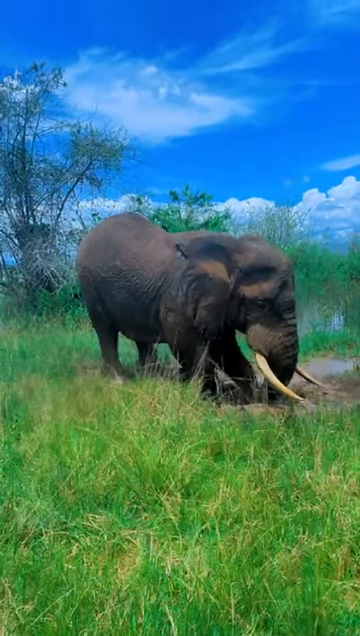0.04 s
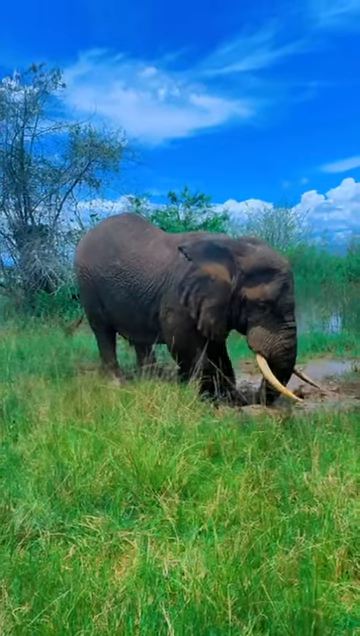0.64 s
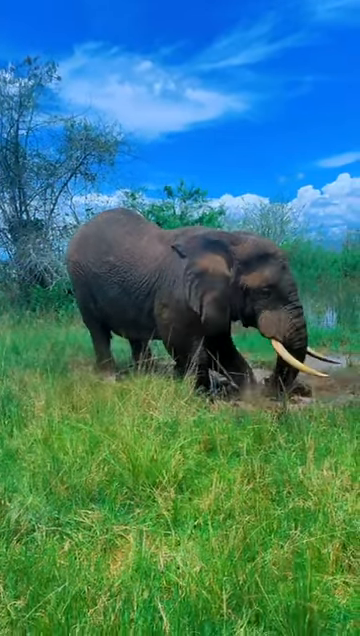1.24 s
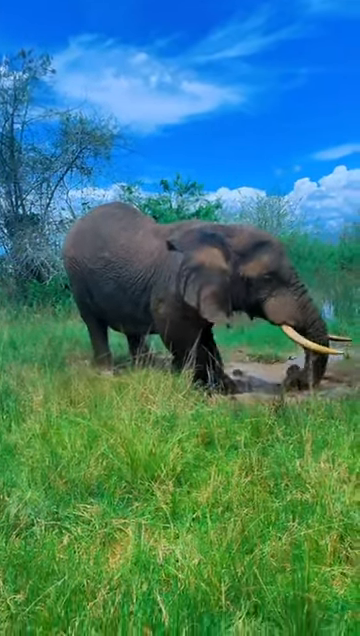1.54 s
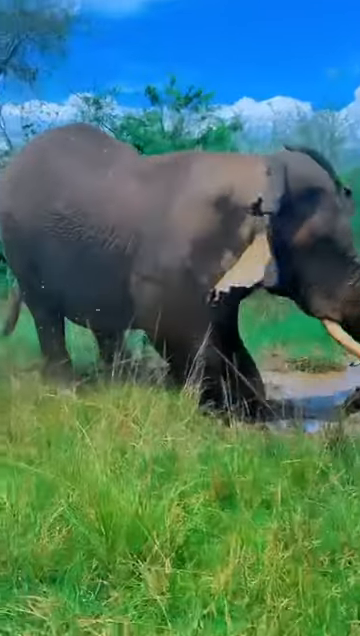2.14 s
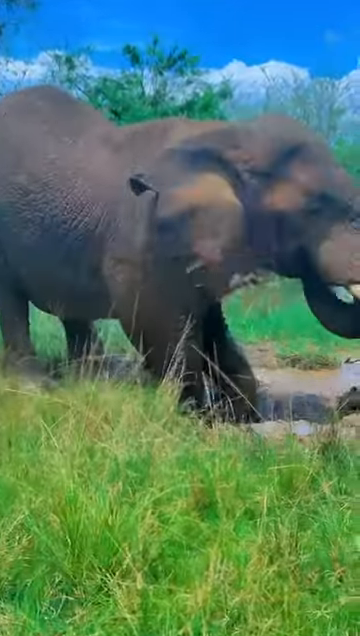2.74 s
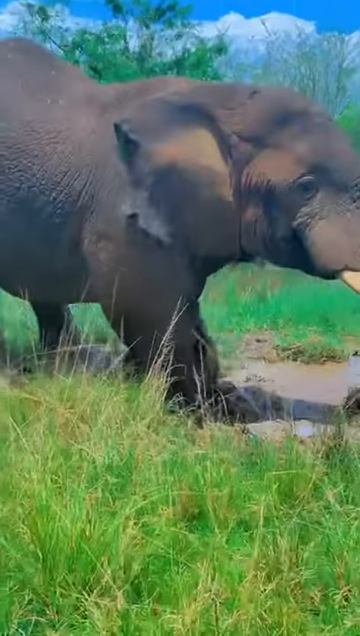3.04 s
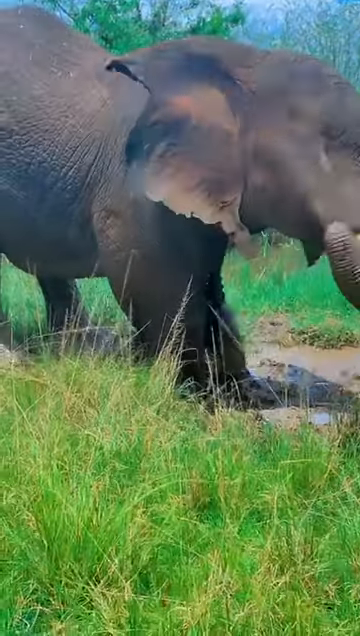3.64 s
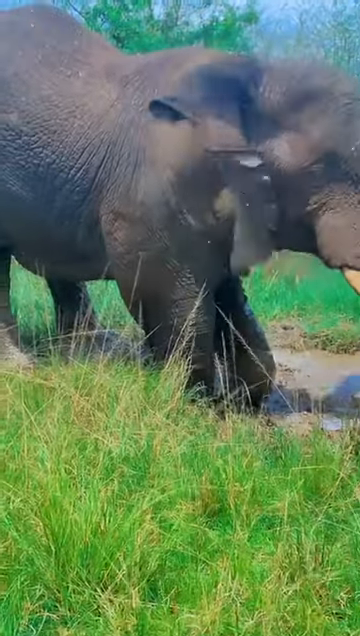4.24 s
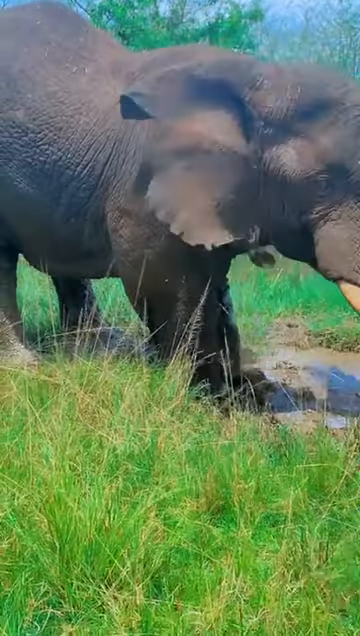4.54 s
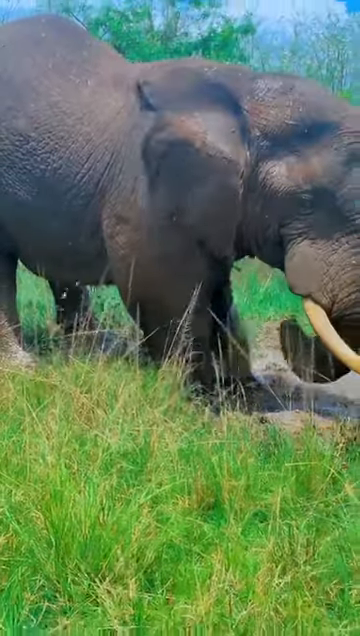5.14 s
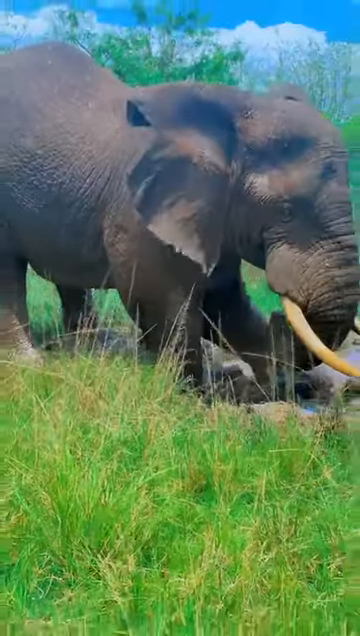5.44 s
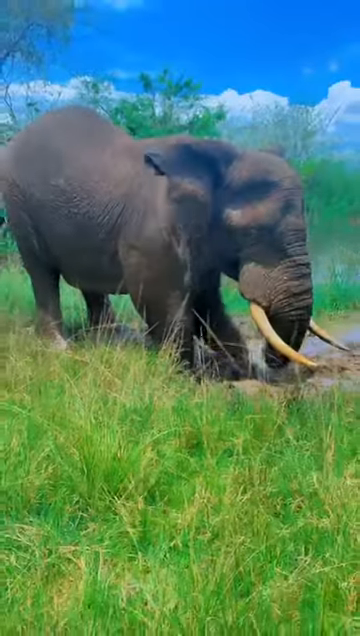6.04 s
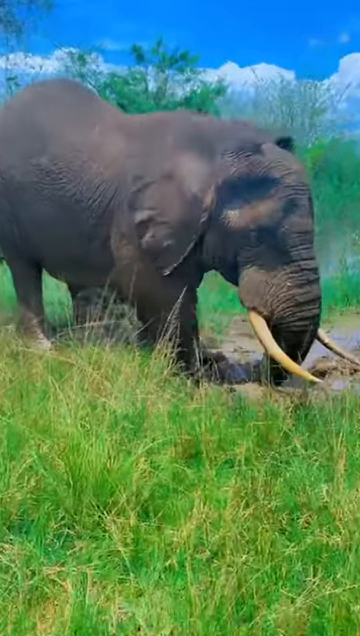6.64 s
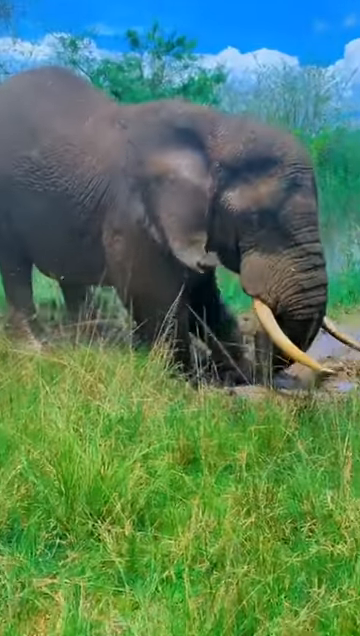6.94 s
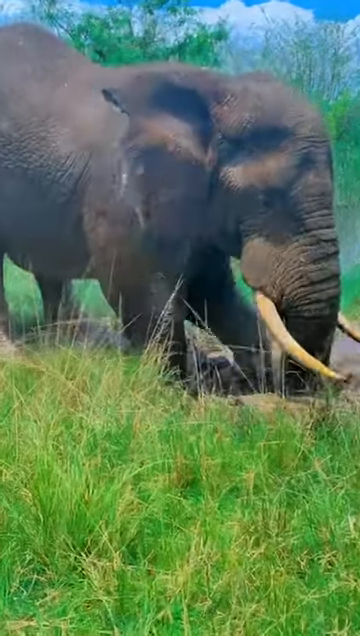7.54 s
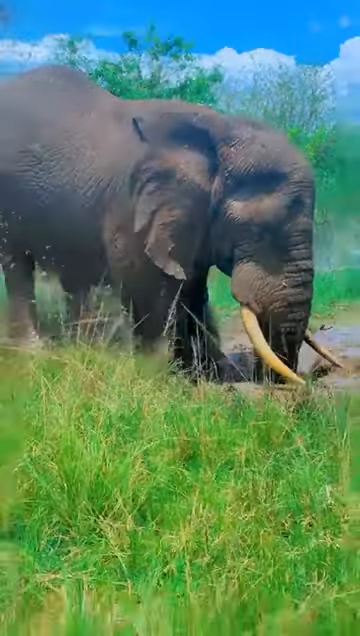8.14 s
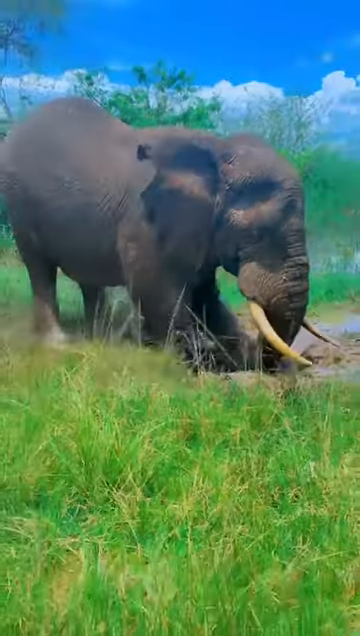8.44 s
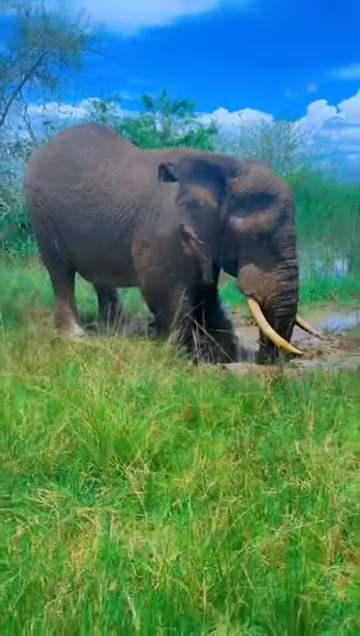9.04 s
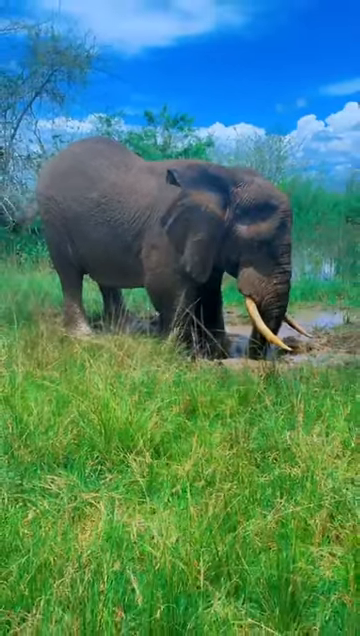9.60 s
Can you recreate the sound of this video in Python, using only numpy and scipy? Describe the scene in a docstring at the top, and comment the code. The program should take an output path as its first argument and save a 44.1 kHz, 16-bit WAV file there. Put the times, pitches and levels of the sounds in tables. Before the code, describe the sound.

Mud and water splash, gurgle and patter as an elephant wallows outdoors, with one long, sputtering trunk blow midway.

```python
"""Elephant in a mud bath

An elephant churns a muddy waterhole with its feet and trunk, some way off across grass.
Thrown mud patters down as a bright spray of tiny clicks, and heavy clods slap and thud.
The water sloshes and gulps because trapped bubbles ring: the bigger the bubble, the lower the note.
Midway the trunk blows a long jet of air and muddy water, which hisses as the tip narrows."""
import sys
import numpy as np
from scipy import signal
from scipy.fft import rfft, irfft, next_fast_len
from scipy.io import wavfile
from scipy.ndimage import uniform_filter1d, map_coordinates

SR = 44100
rng = np.random.default_rng(int(sys.argv[2]) if len(sys.argv) > 2 else 0)


def waveform_to_disk(signal):
    """Save audio, clipped to [-1, 1], as 16-bit WAV at the path in sys.argv[1]."""
    frames = np.transpose(np.atleast_2d(signal))
    scaled = np.clip(frames, -1, 1) * 32767
    samples = np.round(scaled).astype(np.int16)
    wavfile.write(sys.argv[1], SR, samples)


N = 435266

# tone colour of falling drops: f/Hz, level/dB
DROP_SPECTRUM = [(1500, -26), (3200, -16), (4300, -10.5), (5000, -11.5), (5500, -5.5), (6100, -6.5),
                 (6800, -7.5), (8000, -2), (9200, -2.5), (9800, -4.5), (10500, -5.5), (11400, -8.5),
                 (12000, -22)]
# tone colour of sloshing water: f/Hz, level/dB
SLOSH_SPECTRUM = [(300, -45), (560, -3.5), (690, -3), (810, -0.5), (885, -14), (1030, -0.5), (1260, -1),
                  (1460, -4.5), (1850, -3), (2130, 1.5), (2550, -8.5), (3300, -8.5), (4300, -4),
                  (8000, -28)]
# sweeps of a leg or the trunk through the pool: crest/s, rise/s, fall/s, spray/dB, slosh/dB
STROKES = [(.03, 0.65, 0.3, -23.5, -36), (.88, 0.31, 1, -25, -43.5), (1.27, 0.22, 0.42, -25.5, -36.5),
           (1.7, 0.2, 0.18, -25, -37.5), (2.13, 0.22, 0.082, -34.5, -42), (2.48, 0.24, 0.3, -23.3, -36.5),
           (3.19, 0.087, 0.22, -24.5, -39.5), (3.44, 0.1, 0.23, -24, -34.5), (5.08, 0.15, 0.17, -43, -49.5),
           (5.5, 0.31, 0.089, -29, -49), (5.78, 0.21, 0.14, -25, -34), (6.55, 0.69, 0.57, -32.5, -41.5),
           (7.25, 0.29, 1, -25, -40.5), (7.57, 0.28, 0.14, -23, -30), (8.42, 0.54, 1, -30.5, -44.5),
           (8.83, 0.16, 0.22, -25.5, -35.5)]
BLOW = (3.876, 0.53, 0.34)  # the blow through the trunk: crest/s, rise/s, fall/s
ROUNDNESS = 1.48  # shape of a swell: 1 is a sharp peak, 2 a bell


def amp(db):
    """Turn decibels into a gain to multiply by."""
    return 10 ** (np.asarray(db) / 20)


def unit(x):
    """Scale x to an average (rms) level of 1."""
    return x / np.sqrt(np.mean(x ** 2) + 1e-20)


def along(points, hz):
    """Read between (f/Hz, value) points, with octaves evenly spaced."""
    freqs, values = np.transpose(points)
    return np.interp(np.log(hz + 1), np.log(freqs), values)


def wobble(rate):
    """A smooth curve through random values, rate of them a second."""
    values = rng.standard_normal(int(N * rate / SR) + 4)
    return map_coordinates(values, [np.arange(N) * rate / SR], order=2)


def filtered(x, response):
    """Scale each frequency in x by the gain response(hz)."""
    size = next_fast_len(N + SR // 4)
    return irfft(rfft(x, size) * response(np.fft.rfftfreq(size, 1 / SR)), size)[:N]


def bandpass(x, low_hz, high_hz):
    """Keep mainly what lies between two frequencies."""
    return signal.sosfilt(signal.butter(2, [low_hz, high_hz], "band", fs=SR, output="sos"), x)


def coloured(x, spectrum):
    """Give x a tone colour and an average level of 1."""
    return unit(filtered(x, lambda hz: amp(along(spectrum, hz))))


def add(track, start, sound):
    """Mix a sound into the track, start seconds in."""
    part = track[round(start * SR):][:len(sound)]
    part += sound[:len(part)]


def together(gains):
    """The combined gain of unrelated sounds: their powers add."""
    return np.sqrt(sum(gain ** 2 for gain in gains))


def swell(crest, rise, fall):
    """A gain of 1 at the crest, 10 dB lower rise seconds before and fall seconds after."""
    t = np.arange(N) / SR - crest
    return amp(-10 * np.abs(t / np.where(t < 0, rise, fall)) ** ROUNDNESS)


def swells(rows):
    """The combined gain of several swells."""
    return together(amp(db) * swell(crest, rise, fall) for crest, rise, fall, db in rows)


def tailed_swell(crest, rise, fall, tail_db, db_per_s):
    """A swell that leaves a dying tail."""
    t = np.arange(N) / SR - crest
    return np.maximum(swell(crest, rise, fall), (t > 0) * amp(tail_db - db_per_s * np.abs(t)))


def spurts(rate, life_s, spread_db):
    """A ragged gain: little bursts, rate a second, that start at once and die away."""
    starts = (rng.random(N) < rate / SR) * amp(spread_db * np.clip(rng.standard_normal(N), -2, 2))
    power = signal.lfilter([1], [1, -np.exp(-1 / (life_s * SR))], starts ** 2)
    return unit(np.sqrt(power))


def patchy(x, depth_db):
    """Each spot of mud colours its sound differently for a few hundredths of a second."""
    spectra = signal.stft(x, nperseg=1024)[2]
    patches = uniform_filter1d(rng.standard_normal(spectra.shape), size=3, axis=0)
    patches = unit(uniform_filter1d(patches, size=4, axis=1))
    return unit(signal.istft(spectra * amp(depth_db * patches), nperseg=1024)[1][:N])


def patter(rate, spread_db, wash_db):
    """Tiny impacts, rate a second, over the wash of countless smaller ones."""
    lands = rng.random(N) < rate / SR
    size = amp(spread_db * np.minimum(rng.exponential(size=N), 5))
    clicks = unit(lands * size * rng.choice([-1, 1], N))
    return unit(clicks + amp(wash_db) * rng.standard_normal(N))


def bubbles(count, low_hz, high_hz, cycles, spread_db):
    """Bubbles of random size ring for a few cycles and rise in pitch as they surface."""
    when, smallness, chance = rng.random((count, 3)).T[:, :, None]
    hz = low_hz * (high_hz / low_hz) ** smallness
    n = np.arange(int(4 * cycles / low_hz * SR))
    age = hz * n / SR / cycles
    phase = 2 * np.pi * cycles * age * (1 + 0.035 * np.minimum(age, 4))
    rings = np.sin(phase) * np.exp(-age) * hz * amp(-spread_db * np.log(chance + 0.08))
    positions = (when * N).astype(int) + n
    return unit(np.bincount(positions.ravel(), rings.ravel(), N)[:N])


def resonance(hz, width_hz):
    """Air noise caught in one band around a pitch, which may move."""
    phase = 2 * np.pi * np.cumsum(hz * np.ones(N)) / SR
    return unit(wobble(width_hz) * np.cos(phase) + wobble(width_hz) * np.sin(phase))


def open_air():
    """A faint stir of air, mostly low rumble."""
    spectrum = [(20, 24), (100, 11.5), (400, -10), (2000, -35), (10000, -26)]  # f/Hz, level/dB
    return amp(-55.5) * coloured(rng.standard_normal(N), spectrum)


def bank_echo(x):
    """Banks and bushes scatter the sound back as a short tail."""
    # how long the echo lasts: f/Hz, t60/s (t60 is the time to fade by 60 dB)
    fade_times = [(100, 0.26), (1000, 0.23), (10000, 0.23)]
    hz, t, spectra = signal.stft(rng.standard_normal(SR // 3), SR, nperseg=256)
    tail = signal.istft(spectra * amp(-60 * t / along(fade_times, hz)[:, None]), SR, nperseg=256)[1]
    return signal.fftconvolve(x, tail / np.linalg.norm(tail))[:N]


def squelches(width_hz=88):
    """Mud squeezes past a foot and drones in the hollow around it."""
    # squeezes of mud: crest/s, rise/s, fall/s, level/dB, f/Hz
    squeezes = [(2.92, 0.034, 0.046, -39, 162), (6.585, 0.049, 0.069, -32.5, 145),
                (6.81, 0.1, 0.068, -37.5, 150), (7.43, 0.15, 0.097, -36, 270),
                (8.19, 0.14, 0.063, -47, 180)]
    out = np.zeros(N)
    for crest, rise, fall, db, hz in squeezes:
        drone = unit(bandpass(rng.standard_normal(SR), hz - width_hz / 2, hz + width_hz / 2))
        add(out, crest - 0.5, amp(db) * swell(0.5, rise, fall)[:SR] * drone)
    return out


def smacks():
    """Wet mud tears open with a click, and the little hollow behind it rings."""
    # suction pockets opening: t/s, level/dB
    openings = [(1.256, -22), (8.574, -13), (8.8645, -10), (8.955, -19)]
    # the notes of such a pocket: f/Hz, relative level/dB, t60/s
    notes = [(2140, -7, 0.017), (4350, -5, .016), (5450, -2.5, .016)]
    out, t = np.zeros(N), np.arange(SR // 10) / SR
    for start, db in openings:
        for hz, note_db, t60 in notes:
            peak_db = db + note_db + rng.standard_normal()
            add(out, start, amp(peak_db - 60 * t / t60) * np.sin(2 * np.pi * hz * t))
    return out


def ticks(crack_t60=0.0018):
    """Single fat drops crack on the wet surface and throw off a wisp of droplets."""
    # sharp drops and snaps of sticky mud: t/s, relative level/dB, wisp t60/s, f/Hz
    snaps = [(0.4088, -3, 0.0026, 7700), (0.4092, 4, 0.0055, 8800), (.4116, -1.5, 0.038, 9000),
             (1.5983, -16, 0.03, 8300), (2.284, -8.5, 0.085, 8950), (5.018, -11.5, 0.02, 6700),
             (5.1105, -12, 0.017, 8400), (5.553, -12.5, 0.061, 3620), (6.8994, -1.5, 0.004, 10100),
             (6.929, -10, 0.025, 8500), (7.128, -9, .02, 8300), (7.2175, -5, 0.025, 7750),
             (8.4255, -25, .02, 8200), (8.61, -9, .01, 9300), (8.8645, -7, 0.012, 8500),
             (9.729, -17.5, 0.025, 8000)]
    out, t = np.zeros(N), np.arange(SR // 10) / SR
    for start, db, t60, hz in snaps:
        crack = np.sin(2 * np.pi * hz * t) * amp(2 - 60 * t / crack_t60)
        crack[0] += 1.5  # the dry click of first contact
        wisp = rng.standard_normal(len(t)) * amp(-7 - 60 * t / t60)
        add(out, start, amp(db - 4.5) * bandpass(crack + wisp, 0.5 * hz, 11500))
    return out


def plops(glide=0.29, roughness=0.35):
    """A lone bubble rings and glides up in pitch; thick water roughens its note."""
    # bubbles left by lumps that drop into open water: t/s, level/dB, starting f/Hz, t60/s
    lone_bubbles = [(.6442, -15, 687, 0.022), (.654, -17, 840, 0.015), (2.104, -30, 382, 0.064),
                    (2.486, -30, 357, 0.056), (2.597, -27, 387, 0.19), (3.082, -30.5, 612, 0.084),
                    (5.356, -34, 920, 0.069), (5.512, -31.5, 347, 0.11), (5.619, -28.5, 380, 0.067),
                    (5.649, -31, 375, .065), (6.517, -14, 750, 0.035), (6.793, -27, 620, 0.017),
                    (8.666, -28.5, 390, 0.06), (8.941, -20, 1980, 0.046), (9.157, -33, 388, 0.041),
                    (9.442, -39, 334.7, 0.064), (9.66, -33.5, 382, 0.055)]
    out, t = np.zeros(N), np.arange(SR // 5) / SR
    for start, db, hz, t60 in lone_bubbles:
        phase = 2 * np.pi * np.cumsum(hz * (1 + glide * np.minimum(t / t60, 1))) / SR
        slop = unit(bandpass(rng.standard_normal(len(t)), 0.5 * hz, 2 * hz))
        level = amp(db - 60 * t / t60) * (1 - np.exp(-2 * t * hz))
        add(out, start, level * (np.sin(phase) + roughness * slop))
    return out


def air_pocket(hz, t60):
    """Trapped air rings briefly, rising in pitch, while the mud around it shudders."""
    t = np.arange(SR // 3) / SR
    pitch = hz * (0.934 + 0.57 * np.minimum(t / t60, 1))
    ring = np.sin(2 * np.pi * np.cumsum(pitch) / SR)
    shudder = unit(bandpass(rng.standard_normal(len(t)), 0.46 * hz, 1.47 * hz))
    depth = 1 / (1 + (hz / 220) ** 2)  # big, deep pockets are mostly shudder
    level = amp(-60 * t / t60) * (1 - np.exp(-t * hz / 0.31))
    return level * ((1.3 - 0.86 * depth) * ring + (0.73 + 1.1 * depth) * shudder)


def gulps_and_thuds():
    """Air pockets close in the mud: singly as a gulp, or several at once under a thud; a few wet slaps sound
    alongside, short and broad."""
    # single pockets, and a few short, broad wet slaps near 1 kHz made the same way: t/s, level/dB, f/Hz
    gulps = [(0.287, -20.5, 168), (0.323, -13.5, 473), (.645, -28, 1090), (0.983, -28.5, 1730),
             (1.676, -27, 400), (2.031, -28, 330), (2.311, -26, 2120), (2.462, -32, 275),
             (2.819, -24.5, 101), (3.31, -27, 229), (3.36, -26, 760), (4.662, -24.5, 776),
             (4.685, -24.5, 1090), (5.322, -34, 836), (5.327, -32, 131), (6.29, -30, 244),
             (6.347, -35, 690), (6.52, -24, 1030), (7.914, -22.5, 1310), (8.104, -33, 163),
             (8.205, -27, 1214), (8.535, -32, 263), (9.131, -35, 100)]
    # heavy clods and footfalls: t/s, level/dB, hardness/(dB per octave)
    thuds = [(.305, -21, -2), (0.646, -30.5, 6.5), (4.661, -28, -1.5), (6.347, -26.5, 0.5),
             (6.518, -25, 0.5), (6.795, -27, 4), (7.732, -23.5, -1), (7.799, -13, 2), (8.2, -29.5, 6)]
    # the notes the mud answers a thud with: f/Hz, relative level/dB, t60/s
    mud_notes = [(154, 2.5, 0.11), (356, -0.5, 0.056), (715, -3, 0.016)]
    # how the path low over wet ground colours them all: f/Hz, gain/dB
    ground_path = [(60, -7), (100, -2.5), (160, -3.5), (300, -3), (390, 5.5), (450, 1.5), (520, -9.5),
                   (640, 2), (800, -3.5), (890, -12), (1030, -4), (1300, 1)]
    out, middle_hz = np.zeros(N), mud_notes[1][0]
    for start, db, hz in gulps:
        t60 = 0.063 * (400 / hz) ** 0.26  # small pockets die sooner
        add(out, start, amp(db) * air_pocket(hz, t60))
    for start, db, hardness in thuds:
        for hz, note_db, t60 in mud_notes:
            closing_s = 0.94 / hz  # deep pockets close slowly, so they sound last
            level = amp(db + note_db + hardness * np.log2(hz / middle_hz))
            add(out, start + closing_s, level * air_pocket(hz, t60))
    return filtered(out, lambda hz: amp(along(ground_path, hz)))


def splashes():
    """A clod lands with a wet slap and bursts into bright drops that fade away."""
    # clods landing: t/s, level/dB, landing time/s, t60/s, slap compared with drops/dB
    clods = [(0.049, -31.5, 0.011, 0.062, 3), (0.294, -16.5, 0.03, 0.37, -11.5),
             (0.474, -22, 0.005, 0.31, -9.5), (0.606, -30, 0.0029, 0.092, -7.5),
             (0.657, -38.5, 0.011, 0.04, 11), (.722, -26.5, 0.021, 0.058, -14),
             (.972, -23.5, 0.029, 0.12, -19), (1.053, -23.5, .008, 0.062, -7),
             (1.12, -18, 0.0045, 0.017, -26), (1.156, -24, .005, .05, -17),
             (1.202, -24.5, 0.051, 0.16, -5.5), (1.43, -27.5, 0.023, .06, -4),
             (1.506, -23.5, .006, 0.021, -13), (1.668, -26, 0.061, 0.21, -7),
             (1.869, -23, 0.0092, 0.043, -20), (2.008, -27, 0.0064, 0.036, -18),
             (2.08, -30, 0.0051, 0.046, -2.5), (2.135, -27.5, 0.0087, 0.067, -25),
             (2.308, -18.5, 0.006, 0.22, -16), (2.431, -17, 0.01, 0.14, -34), (2.46, -32, 0.012, 0.053, 2),
             (2.889, -35, 0.048, .14, -0.5), (3.102, -27.5, 0.004, 0.15, -5.5),
             (4.652, -20.5, 0.033, 0.21, -9), (4.804, -40.5, 0.0067, 0.051, 4),
             (4.815, -29.5, 0.017, 0.046, -35), (5.178, -32, 0.0037, .05, -20),
             (5.227, -29, 0.0058, 0.065, -12), (5.32, -43, 0.0057, 1, 3.5), (6.21, -29.5, 0.015, 0.053, -8),
             (6.346, -21.5, 0.014, 0.36, -14), (6.405, -30, 0.0075, 0.17, 2.5),
             (6.515, -26.5, 0.0097, 0.039, -10), (6.585, -29, .008, 0.11, -16),
             (6.629, -25.5, 0.01, 0.032, -5), (6.679, -27, 0.011, 0.028, -5),
             (6.781, -23.5, 0.021, 0.12, -5), (6.9792, -27.5, 0.0033, 0.029, -9.5),
             (7.013, -28.5, 0.0079, 0.083, -8), (7.116, -19.5, 0.016, 0.18, -10),
             (7.575, -20.5, 0.051, 0.15, -9.5), (7.722, -15.5, 0.03, 0.059, -14),
             (7.741, -18.5, 0.038, 0.52, -8), (7.786, -22.5, 0.019, 0.16, -2.5),
             (7.91, -15.5, 0.0067, 0.24, -16), (8.2, -24.5, 0.0064, 0.17, -5.5),
             (8.555, -25.5, 0.024, 0.078, -18), (8.712, -26, 0.048, 0.17, -8.5),
             (8.941, -23, 0.013, 0.07, -8), (9.21, -33, 0.018, 0.1, -7.5),
             (9.6615, -36, .002, 0.049, -43.5)]
    drop_level, slap_level, t = np.zeros(N), np.zeros(N), np.arange(SR // 2) / SR
    for start, db, landing, t60, slap_db in clods:
        rise = amp(db) * (1 - np.exp(-t / (0.0002 + 0.2 * landing)))
        fall_db = -60 * np.maximum(t - landing, 0) / t60
        add(drop_level, start, rise * amp(fall_db))
        add(slap_level, start, rise * amp(slap_db + 0.98 * fall_db))
    drops = patchy(patter(rate=6000, spread_db=-4, wash_db=4.5), depth_db=1)
    slap = patchy(patter(rate=2700, spread_db=3, wash_db=-1), depth_db=4)
    return drop_level * coloured(drops, DROP_SPECTRUM) + slap_level * coloured(slap, SLOSH_SPECTRUM)


def stirring():
    """Legs and trunk push through the pool: small bubbles slosh, large ones gurgle, the mud heaves."""
    # the animal shifts its weight in the mud: crest/s, rise/s, fall/s, relative level/dB
    heaves = [(.32, 0.075, 0.09, -26.5), (1.68, 0.14, 0.12, -35), (2.4, 0.84, .3, -50),
              (2.84, 0.028, 0.29, -34), (3.58, 0.32, 0.41, -31.5), (4.68, 0.024, 0.47, -43),
              (6.6, 0.36, 0.51, -40.5), (7.812, 0.066, 0.023, -20.5)]
    # tone colours of large bubbles and of churned mud: f/Hz, level/dB
    gurgle_spectrum = [(70, -34), (170, -4.5), (270, -1), (330, -2.5), (390, 5.5), (440, 1.5), (500, -27),
                       (800, -11)]
    mud_spectrum = [(20, -32), (42, -12), (62, -9.5), (90, -6), (150, -2.5), (260, -16), (500, -16),
                    (1500, -37)]
    motion = together(amp(db) * tailed_swell(crest, rise, fall, tail_db=-12, db_per_s=12)
                      for crest, rise, fall, _, db in STROKES)  # the tail is the pool settling
    fizz = amp(-15) * bubbles(count=2400, low_hz=575, high_hz=3840, cycles=3.4, spread_db=4)
    froth = fizz + patchy(patter(rate=2300, spread_db=1, wash_db=3.5), depth_db=2)
    pockets = amp(-15) * bubbles(count=1200, low_hz=171, high_hz=557, cycles=3.6, spread_db=5.5)
    pockets += unit(rng.standard_normal(N))
    laps = spurts(rate=800, life_s=0.009, spread_db=3.5)
    slosh = amp(2.5) * motion * laps * coloured(froth, SLOSH_SPECTRUM)
    large_share = (motion / motion.max()) ** 0.055  # harder strokes trap more large bubbles
    gurgle = motion * large_share * coloured(pockets, gurgle_spectrum)
    heave = together([swells(heaves), amp(-12.5) * motion])
    lumps = amp(1.5 * wobble(25))
    mud = amp(-3) * heave * lumps * coloured(rng.standard_normal(N), mud_spectrum)
    return slosh + gurgle + mud


def spray(fat_drops_per_s=22):
    """Drops of thin mud, thrown by each stroke and by the trunk's blow, fall back in little spurts."""
    runoff = dict(tail_db=-16, db_per_s=6)  # water keeps running off, ever less
    thrown = together(amp(db) * tailed_swell(crest, rise, fall, **runoff)
                      for crest, rise, fall, db, _ in STROKES)
    level = together([thrown, amp(-20) * tailed_swell(*BLOW, **runoff)])
    clumps = spurts(rate=1300, life_s=0.003, spread_db=3)
    drops = patchy(patter(rate=5900, spread_db=0, wash_db=7.5), depth_db=3)
    fat_drops = unit((rng.random(N) < fat_drops_per_s / SR) * rng.uniform(0.64, 1, N))
    fat_drops *= amp(-19) * (level.max() / level) ** 0.25  # they stand out as the spray thins
    return amp(0.5) * level * coloured(clumps * drops + fat_drops, DROP_SPECTRUM)


def trunk_jet(tube_hz=396, tip_hz=1777, tip_hz_per_s=1300):
    """Air and water flutter out of the trunk and make its tube sing; the narrowing tip hisses."""
    # tone colours of the jet's rush, hiss and flutter: f/Hz, level/dB
    rush_spectrum = [(300, -7), (520, -7), (680, 0.5), (800, -1.5), (890, -10), (1050, 3), (1250, 1),
                     (1600, -11), (3000, -56)]
    hiss_spectrum = [(900, -17), (1450, -9.5), (1660, 3), (1900, -5), (2130, 1.5), (2600, -5), (3200, -4),
                     (3800, -6.5), (4300, -1), (4900, -10), (6000, -9), (11000, -11)]
    flutter_spectrum = [(45, -9), (90, -3), (135, -8), (200, 5.5), (310, -2), (480, -16), (900, -19.5)]
    # the slack trunk flutters as the blow starts and gives out: crest/s, rise/s, fall/s, level/dB
    flutters = [(3.31, 0.23, 0.11, -33.5), (4.36, 0.17, 0.39, -35)]
    # water gushes through the tip near the end of the blow, and a hollow sigh of air follows as it gives out:
    # crest/s, rise/s, fall/s, level/dB, f/Hz, width/Hz
    surges = [(3.92, 0.094, 0.048, -38, 687, 201), (4.04, 0.036, 0.044, -29, 1310, 601),
              (4.115, 0.043, 0.23, -32, 2036, 481), (4.36, 0.25, 0.32, -41, 1290, 602),
              (4.53, .2, 0.17, -48.5, 722, 448)]
    narrowing = (3.976, 0.2, 0.28)  # of the tip: crest/s, rise/s, fall/s
    t, blow = np.arange(N) / SR, swell(*BLOW)

    def air(spectrum, depth_db):
        """Rushing air: noise whose tone colour flickers."""
        return coloured(patchy(rng.standard_normal(N), depth_db), spectrum)

    rush = amp(-33) * blow * air(rush_spectrum, depth_db=3)
    hiss_level = together([tailed_swell(*narrowing, tail_db=-2, db_per_s=58), amp(-4) * blow])
    hiss = amp(-21.5) * hiss_level * air(hiss_spectrum, depth_db=3)
    flutter = together([swells(flutters), amp(-41.5) * blow]) * air(flutter_spectrum, depth_db=4.5)
    tip_open = np.exp(-np.abs(t - np.clip(t, 3.41, 3.86)) / 0.0049)  # 1 while the tip is wide open
    gargle = unit(amp(3 * wobble(55)))  # water in the tube breaks up its note
    tube_note = amp(-35.5) * np.sqrt(blow) * tip_open * gargle * resonance(tube_hz, width_hz=36)
    tip_pitch = tip_hz + tip_hz_per_s * np.clip(t - narrowing[0], -0.5, 0.15)
    tip_note = amp(-34) * swell(*narrowing) * resonance(tip_pitch, width_hz=620)
    surge_notes = sum(amp(db) * swell(crest, rise, fall) * resonance(hz, width)
                 for crest, rise, fall, db, hz, width in surges)
    sputter = amp(0.8 * wobble(64))
    return sputter * (rush + hiss + flutter) + tube_note + tip_note + surge_notes


def scene():
    """The mud bath in the open, in mono; only the sudden sounds get an echo."""
    hits = splashes() + gulps_and_thuds() + plops() + ticks() + smacks()
    flowing = open_air() + spray() + stirring() + squelches() + trunk_jet()
    return (flowing + hits + amp(-7.5) * bank_echo(hits))[None]


def record(dry, bass_hz=42, ceiling=0.8, top_hz=12000):
    """The microphone sheds the deepest bass and cuts the highest treble; the loudest peaks are rounded off
    softly."""
    trimmed = filtered(dry[0], lambda hz: hz ** 3 / np.sqrt(hz ** 6 + bass_hz ** 6))
    rounded = trimmed / (1 + np.abs(trimmed / ceiling) ** 6) ** (1 / 6)
    return filtered(rounded, lambda hz: hz < top_hz)[None]


dry = scene()
out = record(dry)
waveform_to_disk(out)
```